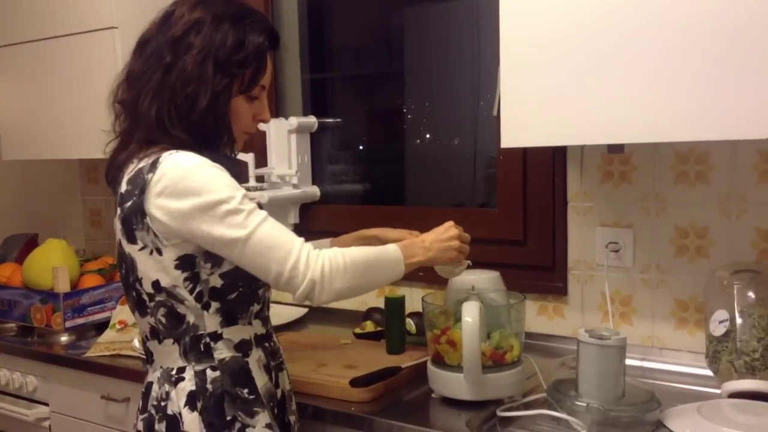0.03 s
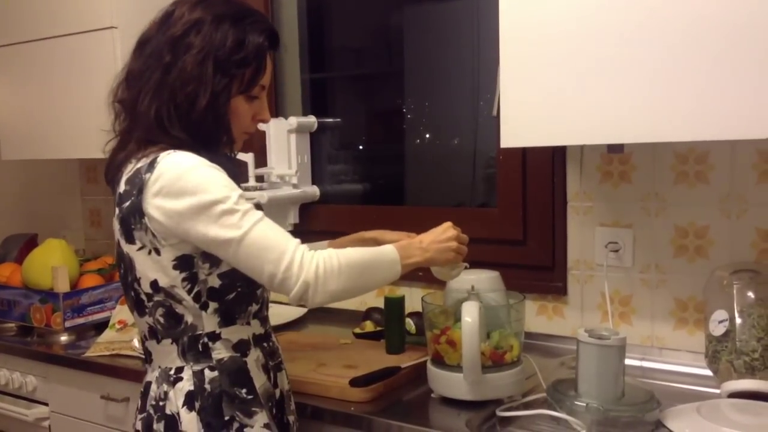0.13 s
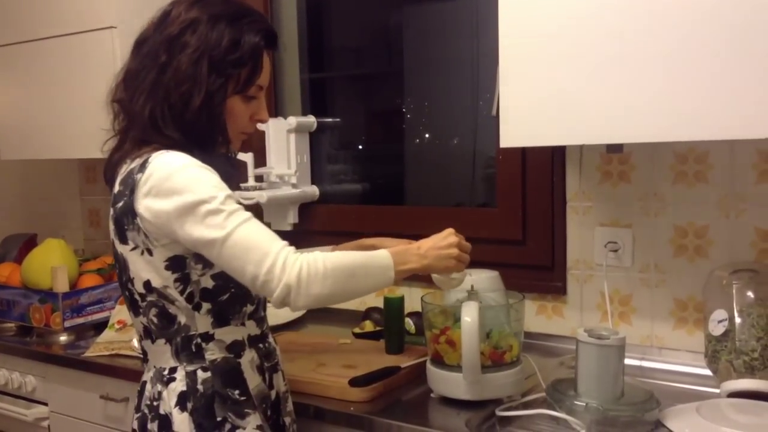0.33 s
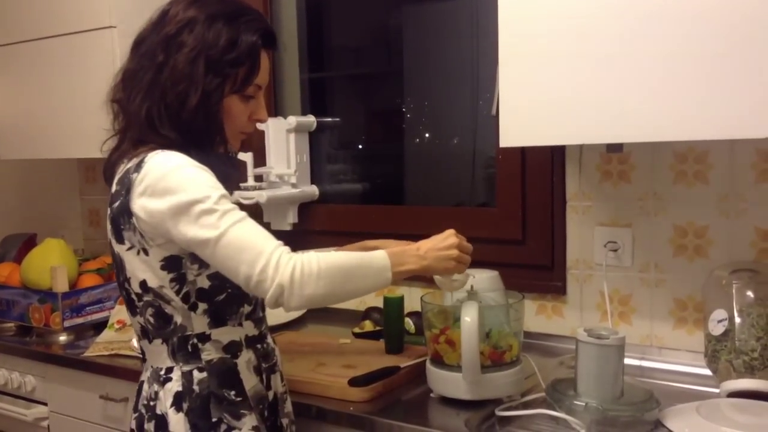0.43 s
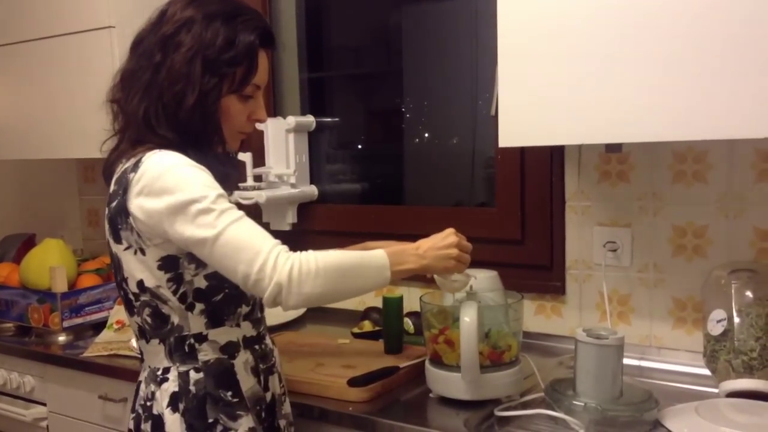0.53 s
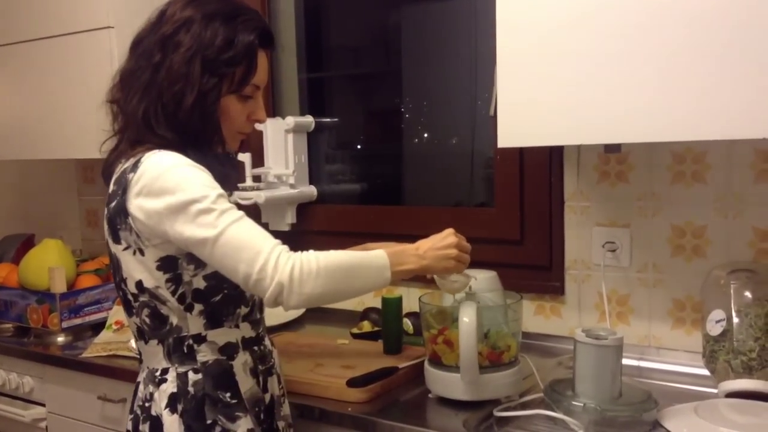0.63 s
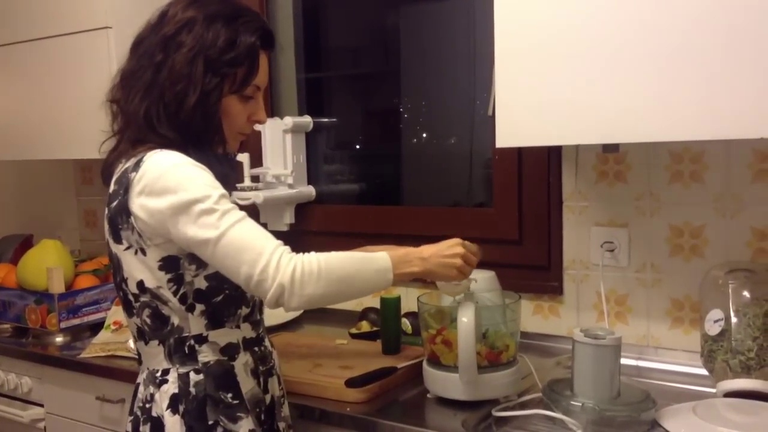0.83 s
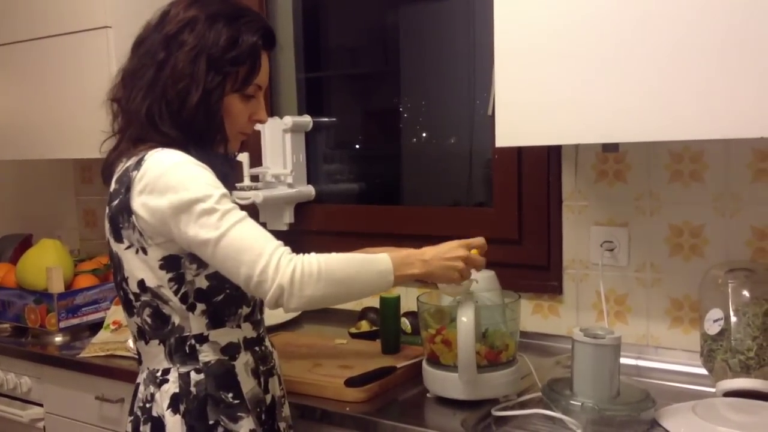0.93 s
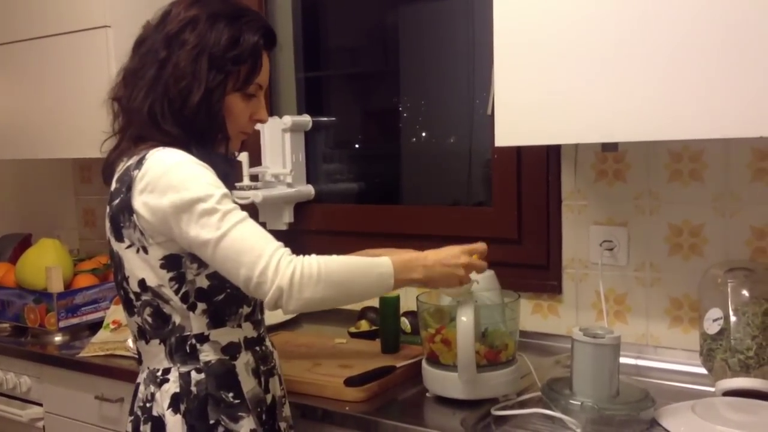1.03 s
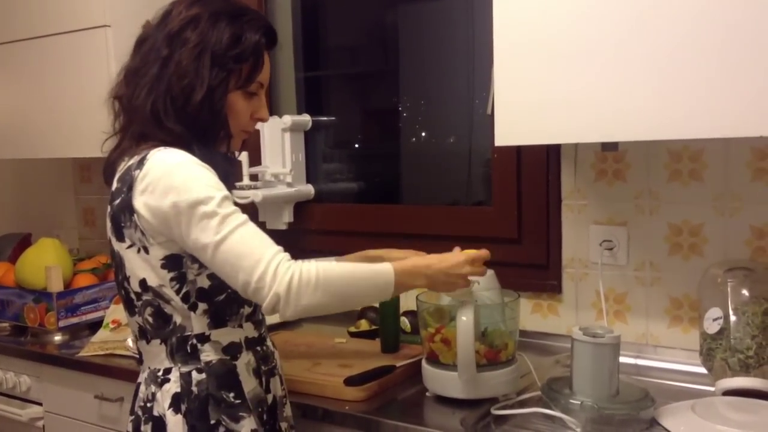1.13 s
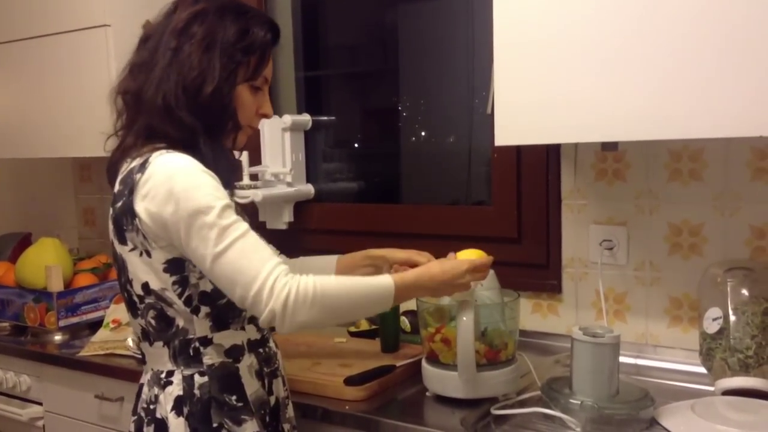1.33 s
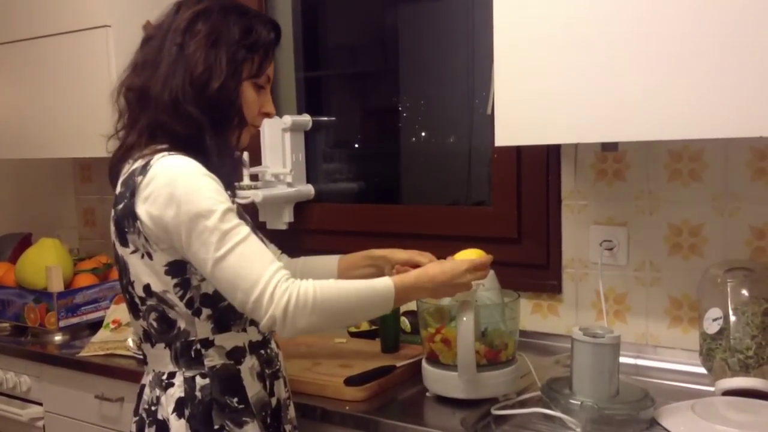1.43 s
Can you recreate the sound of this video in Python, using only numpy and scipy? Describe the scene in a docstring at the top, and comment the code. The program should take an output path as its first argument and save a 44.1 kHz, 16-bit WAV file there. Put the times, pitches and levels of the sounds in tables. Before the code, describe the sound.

Lemon squeezed by hand, with small wet squirts and drops clicking into a plastic bowl.

```python
"""Lemon squeezed over a plastic bowl

Half a lemon is squeezed by hand over the bowl of a food processor in a tiled kitchen. Pips and drops
click on the plastic and set it ringing faintly, juice squirts and fizzes through the pulp, the wet
peel snaps, and there are two soft bumps. The room answers over a faint appliance hum and hiss."""
import sys
import numpy as np
from scipy import signal
from scipy.fft import rfft, irfft
from scipy.io import wavfile
from scipy.ndimage import uniform_filter1d

SR = 44100
rng = np.random.default_rng(int(sys.argv[2]) if len(sys.argv) > 2 else 0)


def store_wav(level_fs):
    """Save 16-bit WAV to argv[1]."""
    pcm = np.round(np.clip(np.atleast_2d(level_fs), -1, 1) * 32767)
    wavfile.write(sys.argv[1], SR, pcm.T.astype(np.int16))


N = 66150

# pips and drops hitting the bowl: (time [s], level [dB], treble shelf [dB], room send [dB])
CLICKS = [(0.243, 0.5, -5, 1.5), (0.3138, -9.5, 11.5, -2), (0.326, -11, 3.5, -0.5), (.3385, -10.5, 20, -5),
          (0.401, -23, -9, -23)]
# EQ of a click: (frequency [Hz], gain [dB])
CLICK_EQ = [(100, -35), (250, -14.5), (520, -16), (800, -9.5), (1300, -2.5), (2600, -2), (5500, -1),
            (8000, -3), (10200, 1.5), (12500, -6.5), (14500, -3)]
CLICK_DB, CONTACT_S, SHELF_HZ, SHELF_STEEPNESS, RING_DB = -0.5, 0.00032, 9870, 2.8, -48
# modes of the plastic bowl: (frequency [Hz], level [dB], t60 [s])
BOWL_MODES = [(437, 5, .6), (660, -1, .45), (1070, 3, .45), (1260, 1, .4), (1490, 2, .35), (1596, 2, .35),
              (1680, 1, .35), (2585, 2, .3), (2695, 0, .3), (5596, -1, .25), (9062, 0, .25),
              (10510, -1, .25)]
# juice forced through the pulp: (time [s], length [s], level [dB], pitch [Hz], fizz [dB])
SQUIRTS = [(0.3174, 0.016, -17, 4130, 1.5), (0.867, 0.014, -14, 3960, -13), (0.879, 0.0094, -26, 1470, 1),
           (0.9388, 0.0045, -27, 2090, -9.5), (0.9812, 0.0068, -36.5, 4400, -3)]
# wet pockets in the pulp: (frequency [x pitch], half width [x pitch], level [dB])
POCKET_MODES = [(.46, 0.1, -6), (.872, 0.058, 5.5), (1.009, 0.073, 10), (1.17, 0.16, -1)]
# EQ of the spray: (frequency [Hz], gain [dB])
FIZZ_EQ = [(300, -23.5), (1300, 2.5), (2500, 10), (4800, 7.5), (7800, 0), (10500, -2.5), (12500, 6.5),
           (15000, -4)]
BURSTS_PER_S, BURST_SPREAD_DB = 5000, 2
# tiny wet snaps in the peel: (time [s], level [dB])
SNAPS = [(0.193, -28), (.8315, -27), (0.9014, -20), (0.95, -26.5), (0.985, -28), (1.154, -25.5)]
# EQ of a snap: (frequency [Hz], gain [dB])
SNAP_EQ = [(500, -20), (3000, -25), (7000, -16), (10500, -4), (15000, -13)]
# plops, one alone and three in a cluster: (time [s], level [dB], pitch [Hz], swell [s], sag [1/s])
BUMPS = [(0.5144, -54, 201, .010, 2.1), (1.2695, -47, 780, 0.0023, 170), (1.2727, -52.5, 212, 0.0042, 35),
         (1.34, -55, 300, 0.0028, 20)]
# decay of the room's tail: (frequency [Hz], t60 [s])
ROOM_T60 = [(200, 0.8), (700, 0.67), (1500, 0.46), (4000, 0.41), (8000, 0.3), (11000, 0.25), (15000, 0.2)]
# resonances of the room's tail: (frequency [Hz], gain [dB])
ROOM_EQ = [(120, -1), (230, 11), (350, 1.5), (520, 2), (680, 4.5), (820, 1), (1250, 1.5), (1900, 0),
           (15000, 1)]
EARLY_DECAY_S, EARLY_DB, TAIL_DB, TAIL_RISE_S = 0.016, 5.5, 4.5, 0.0026
# spectrum of room air and hiss: (frequency [Hz], gain [dB])
AIR_EQ = [(25, -38), (60, -15.5), (110, -1), (150, 0), (240, 9.5), (400, 4), (900, 1.5), (1300, 3),
          (2000, -2.5), (7500, -4.5), (10000, -1.5), (12500, -0.5), (15000, -4.5)]
# tones of the appliance hum: (frequency [Hz], level [dB])
HUM_TONES = [(147, -75.5), (197, -73.5)]
AIR_DB, WAVER_DEPTH, WAVER_HZ = -59, 0.39, 11
WHINE_HZ, WHINE_WIDTH_HZ, WHINE_DB = 13300, 170, -71
HIGH_CUT_HZ = 15330


def clicks():
    """Pips and drops hit the plastic: a sharp crack with a faint ring; glancing hits are brighter."""
    out, t = np.zeros(N), clock()
    shelf = lambda f: 1 - 1 / (1 + (f / SHELF_HZ) ** SHELF_STEEPNESS)
    for s, db, treble_db, room_db in CLICKS:
        ring = sum(amp(level - 60 * t / t60) * np.sin(2 * np.pi * (hz * t + rng.random()))
                   for hz, level, t60 in BOWL_MODES)
        hit = kitchen(crack(CONTACT_S), room_db) + amp(RING_DB) * ring
        hit = eq(hit, lambda f: read(CLICK_EQ, f) + treble_db * shelf(f))
        add(out, s, amp(CLICK_DB + db) * hit)
    return out


def squirts():
    """A swell of tiny bursts rings the wet pockets of the pulp and sprays a fizz."""
    out, t = np.zeros(N), clock()
    for s, length, db, pitch_hz, fizz_db in SQUIRTS:
        fires = rng.random(len(t)) < BURSTS_PER_S / SR
        strength = amp(BURST_SPREAD_DB * rng.standard_normal(len(t)))
        polarity = rng.choice([-1, 1], len(t))
        swell = np.sin(np.pi * np.minimum(t / length, 1)) ** 2
        bursts = whiten(fires * polarity * strength * swell)
        pockets = np.zeros(len(t))
        for ratio, half_width, level in POCKET_MODES:
            hz, width_hz = ratio * pitch_hz, 2 * half_width * pitch_hz
            pockets += amp(level) * resonate(resonate(bursts, hz, width_hz), hz, width_hz)
        fizz = amp(fizz_db) * eq(bursts, lambda f: read(FIZZ_EQ, f))
        add(out, s, amp(db) * kitchen(pockets + fizz, room_db=-3))
    return out


def snaps():
    """The wet peel gives way in thin, high ticks."""
    out = np.zeros(N)
    for s, db in SNAPS:
        tick = kitchen(crack(decay_s=0.0011), room_db=2.5)
        add(out, s, amp(db) * eq(tick, lambda f: read(SNAP_EQ, f)))
    return out


def bumps():
    """Low, heavily damped plops whose pitch sags as they die."""
    out, t = np.zeros(N), clock()
    for s, db, hz, swell_s, sag_per_s in BUMPS:
        envelope = (t / swell_s) ** 2 * np.exp(2 * (1 - t / swell_s))
        cycles = np.cumsum(hz / (1 + sag_per_s * t)) / SR
        plop = envelope * np.sin(2 * np.pi * cycles)
        add(out, s, amp(db) * kitchen(plop, room_db=-33))
    return out


def crack(decay_s):
    """A very short burst of contact noise."""
    t = clock()
    return whiten(rng.standard_normal(len(t)) * np.exp(-t / decay_s))


def kitchen(x, room_db, size=256):
    """Direct sound, quick reflections from bowl and worktop, then the tail of the tiled room."""
    t = clock()
    early_noise, tail_noise = rng.standard_normal((2, len(t)))
    early = whiten(early_noise * np.exp(-t / EARLY_DECAY_S))
    hz, frame_s, bands = signal.stft(tail_noise, SR, nperseg=size)
    band_db = read(ROOM_EQ, hz)[:, None] - 60 * frame_s / read(ROOM_T60, hz)[:, None]
    tail = signal.istft(bands * amp(band_db), SR, nperseg=size)[1][:len(t)]
    tail = unit_energy(tail * (1 - np.exp(-t / TAIL_RISE_S)))
    reverb = amp(EARLY_DB) * early + amp(TAIL_DB) * tail
    return x + amp(room_db) * signal.fftconvolve(x, reverb)[:len(x)]


def room_tone():
    """The bed: a wavering appliance hum, a thin high whine, room air and hiss."""
    t, hz = np.arange(N) / SR, np.fft.rfftfreq(N, 1 / SR)
    hum = np.zeros(N)
    for tone_hz, db in HUM_TONES:
        waver = 1 + WAVER_DEPTH * noise(hz < WAVER_HZ)
        phase = 2 * np.pi * (tone_hz * t + rng.random()) + WAVER_DEPTH * noise(hz < WAVER_HZ)
        hum += amp(db) * unit_rms(waver * np.sin(phase))
    whine = unit_rms(resonate(rng.standard_normal(N), WHINE_HZ, WHINE_WIDTH_HZ))
    air = noise(amp(read(AIR_EQ, hz)))
    return amp(AIR_DB) * air + hum + amp(WHINE_DB) * whine


def amp(db):
    """Decibels to gain."""
    return 10 ** (np.asarray(db) / 20)


def unit_rms(x):
    """Scales to rms 1."""
    return x / np.sqrt(np.mean(x ** 2) + 1e-20)


def unit_energy(x):
    """Scales to energy 1."""
    return x / np.sqrt(np.sum(x ** 2) + 1e-20)


def clock():
    """Half a second of time for one event."""
    return np.arange(SR // 2) / SR


def read(points, hz):
    """Reads a curve on a log-frequency axis."""
    f, value = np.transpose(points)
    return np.interp(np.log(hz + 1), np.log(f + 1), value)


def add(mix, s, sound):
    """Drops a sound into the mix at s seconds."""
    part = mix[round(s * SR):][:len(sound)]
    part += sound[:len(part)]


def noise(gain):
    """Noise of rms 1, shaped by a gain per frequency bin."""
    return unit_rms(irfft(rfft(rng.standard_normal(N)) * gain, N))


def eq(x, curve, size=4096):
    """Minimum-phase EQ whose gain in dB is curve(Hz)."""
    log_gain = np.log(amp(curve(abs(np.fft.fftfreq(size, 1 / SR)))))
    taps = np.fft.ifft(np.exp(np.conj(signal.hilbert(log_gain)))).real
    return signal.fftconvolve(x, taps[:size // 2])[:len(x)]


def resonate(x, hz, width_hz):
    """One resonance with a peak gain of 1."""
    r = np.exp(-np.pi * width_hz / SR)
    gain = (1 - r * r) / 2
    return signal.lfilter([gain, 0, -gain], [1, -2 * r * np.cos(2 * np.pi * hz / SR), r * r], x)


def whiten(x):
    """Evens out the broad spectrum of a burst, keeping its fine grain; energy 1."""
    power = uniform_filter1d(abs(rfft(x)) ** 2, size=512)
    hz = np.fft.rfftfreq(len(x), 1 / SR)
    return unit_energy(eq(x, lambda f: -10 * np.log10(np.interp(f, hz, power) + 1e-9)))


def scene():
    """All layers in one mono mix."""
    return (clicks() + squirts() + snaps() + bumps() + room_tone())[None]


def record(dry):
    """A steep high cut on the master."""
    high_cut = signal.firwin(401, HIGH_CUT_HZ, window=("kaiser", 8), fs=SR)
    return signal.oaconvolve(dry, high_cut[None], "same")


dry = scene()
out = record(dry)
store_wav(out)
```